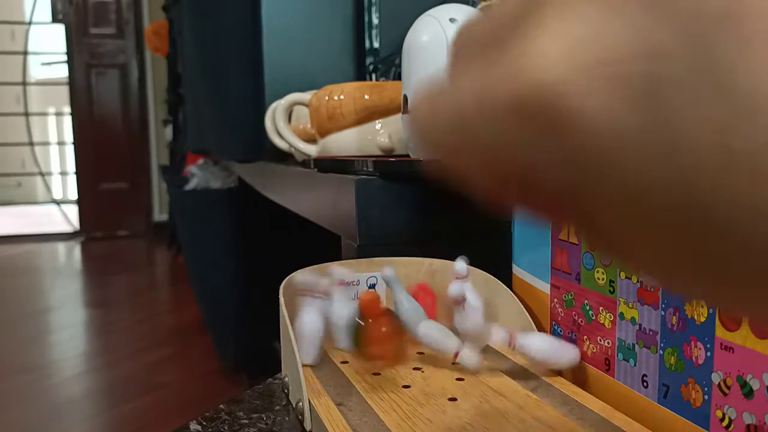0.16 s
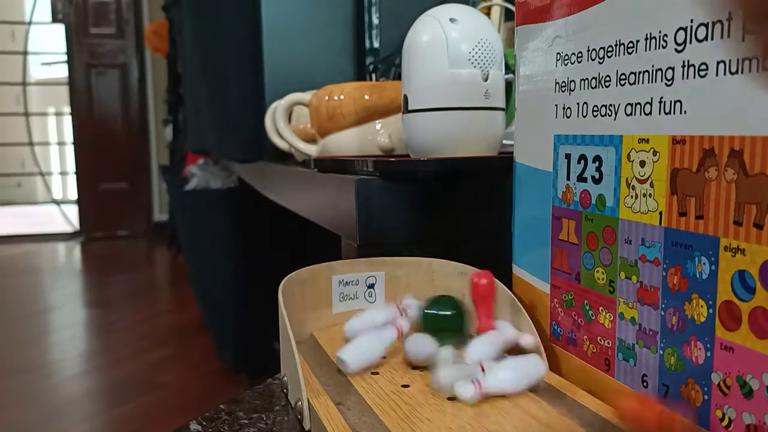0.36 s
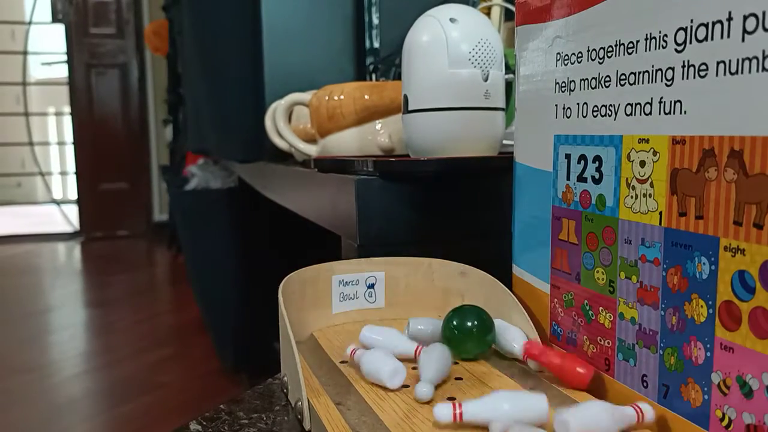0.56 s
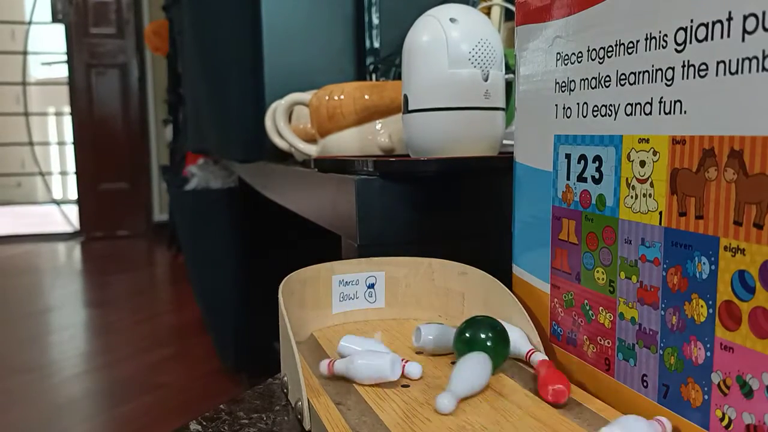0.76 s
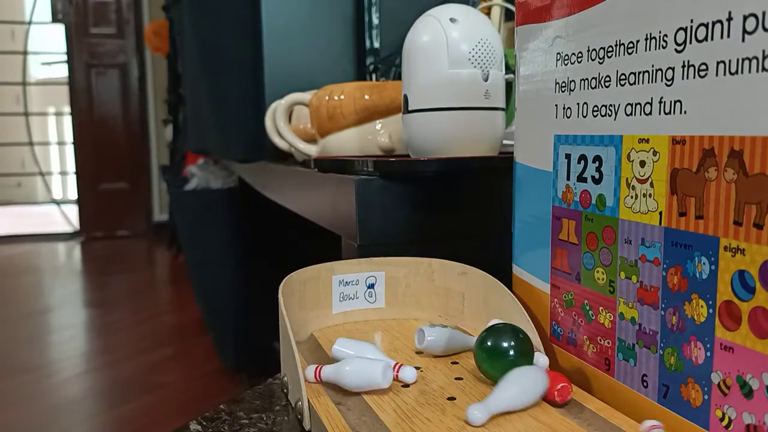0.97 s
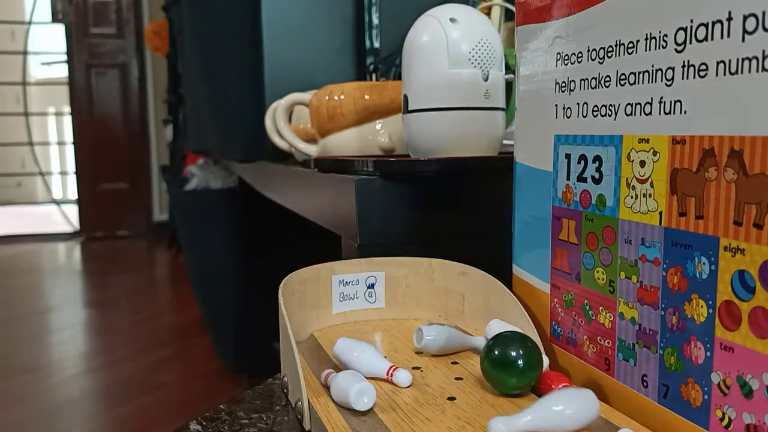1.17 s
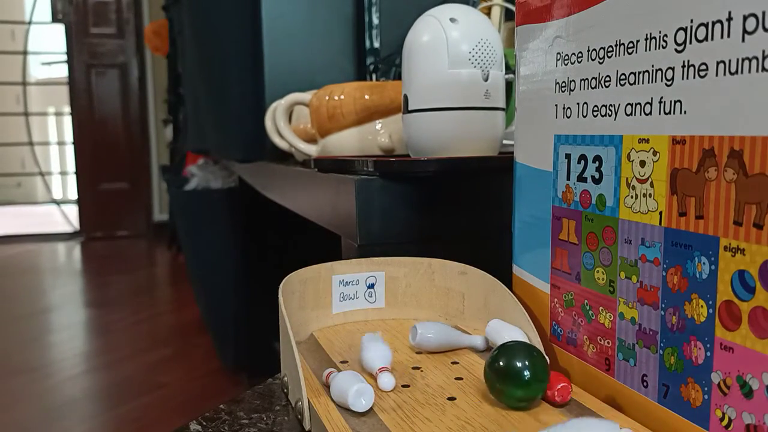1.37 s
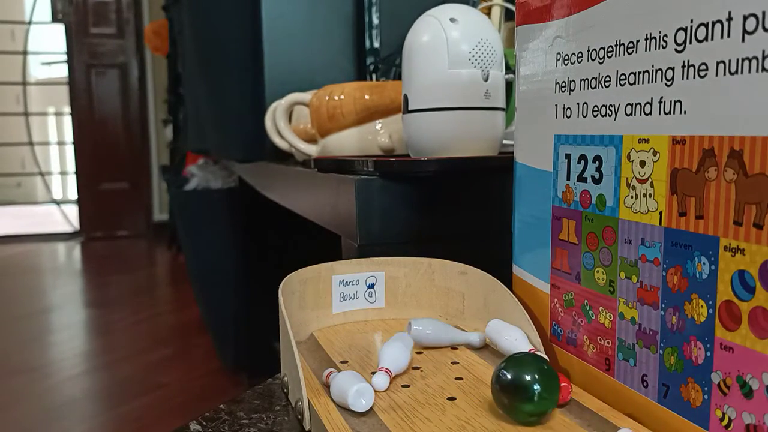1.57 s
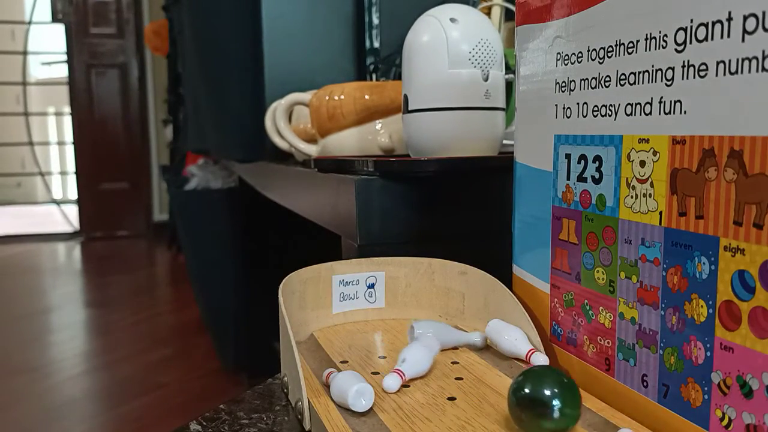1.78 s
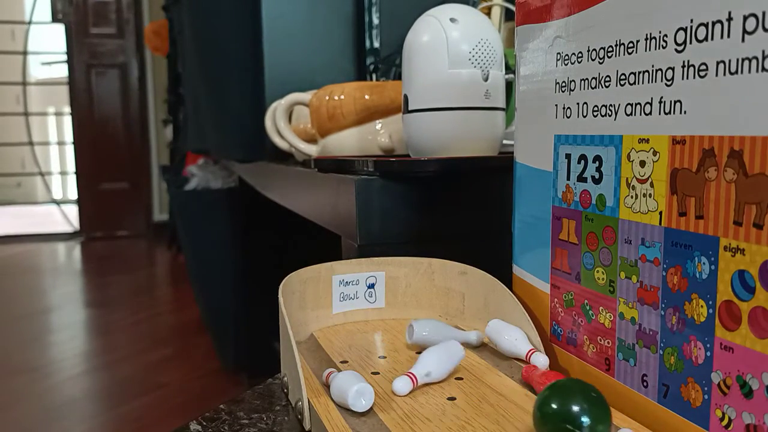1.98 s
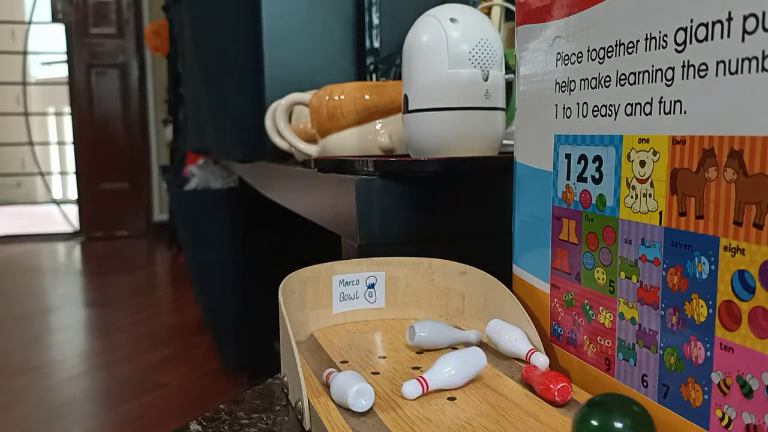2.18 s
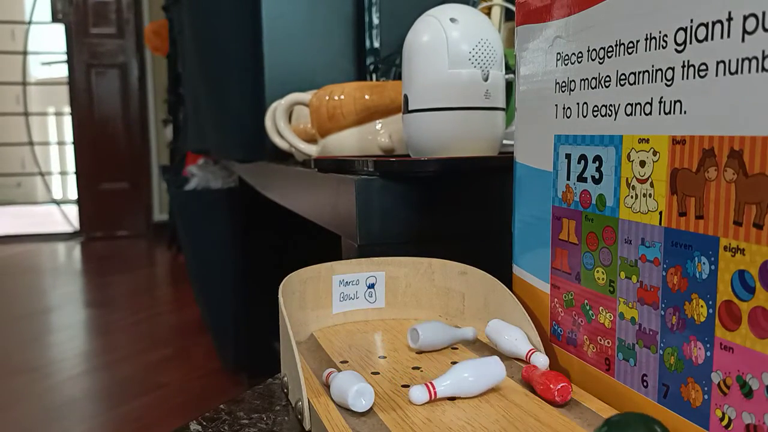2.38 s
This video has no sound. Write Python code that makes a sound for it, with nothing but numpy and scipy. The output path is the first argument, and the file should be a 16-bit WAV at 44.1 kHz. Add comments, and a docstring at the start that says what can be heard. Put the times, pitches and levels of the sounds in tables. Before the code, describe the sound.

A toy pin crash: a faint rub, then a sharp burst of clacks and woody knocks with brief high ringing, tumbling down to rare soft clicks, heard close up in a small, dry room.

```python
"""Room hiss and a mains hum come first, then a faint rub on the board. A small glass ball is flicked into
hard miniature pins on a thin wooden lane in a living room: they crack together, tumble and settle in
ever rarer ticks, and some ring briefly at a high pitch. Short rough contacts excite decaying modes of
board, pin body and crack; rattles and rubs are dense random touches on the same modes.
The hiss is shaped noise, the hum a few sines, the room a dull noise tail."""
import sys
import numpy as np
from scipy import signal
from scipy.fft import rfft, irfft
from scipy.io import wavfile

SR = 44100
rng = np.random.default_rng(int(sys.argv[2]) if len(sys.argv) > 2 else 0)


def output_pcm(signal):
    """Save a mono or channel-first signal as 16-bit PCM at the path in sys.argv[1].

    Samples are clipped to [-1, 1] before scaling.
    """
    pcm = np.clip(np.atleast_2d(signal).T, -1, 1) * 32767
    wavfile.write(sys.argv[1], SR, np.round(pcm).astype(np.int16))


def voltage_ratio(level):
    """Linear amplitude factor for a level in decibels (scalar or array-like)."""
    return 10 ** (np.asarray(level, float) / 20)


N = 108045   # length in samples

# Room hiss colour: f/Hz, relative spectral density level/dB
HISS_SPECTRUM = [(30, -24.5), (64, -6), (80, -12), (110, -7), (300, -15.5), (700, -20.5), (1270, -30.5),
                 (2400, -32.5), (4300, -40.5), (5200, -48.5), (8000, -40), (10300, -52), (14500, -50),
                 (16500, -69.5)]
# Room hiss loudness over time: t/s, rms level/dB
HISS_LEVEL = [(0, -62), (.19, -60.5), (0.899, -56), (1.501, -60), (2.45, -60.5)]
# Mains hum partials: f/Hz, rms level/dB
HUM = [(100, -63), (199, -68), (300, -67.5)]
# Something slides on the board: t/s, length/s, board level/dB, body level/dB, crack level/dB
SLIDES = [(0.118, 0.025, -50.5, -71, -74.5), (1.485, 0.065, -87, -87, -74), (1.89, 0.12, -69, -71.5, -65.5)]
# Tones that stand out while sliding: f/Hz, width/Hz, gain of the body sound through it/dB
SLIDE_SINGS = [(1750, 150, 16), (3253, 100, 10)]
# Tumbling between the knocks: t/s, rattle level/dB
TUMBLE = [(0.198, -70), (.25, -42), (.35, -39), (0.398, -43), (0.499, -39.5), (.65, -46), (.78, -53),
          (0.871, -54.5), (1.001, -72), (1.397, -72.5)]
# A pin knocked free rings: t/s, lower tone level/dB, upper tone level/dB
RINGS = [(0.244, -19.5, -23.5), (0.255, -34, -37), (0.27, -26, -35), (0.32, -15.5, -24), (.385, -31, -36),
         (0.44, -28.5, -40), (.459, -29, -27), (0.481, -34, -33), (0.515, -35, -20.5), (0.578, -28.5, -54),
         (0.616, -45, -55), (.635, -36.5, -67), (.789, -74, -54), (.814, -53, -71), (.831, -53, -69),
         (1.05, -92, -58), (1.075, -67, -53), (1.087, -70, -49.5), (1.098, -68, -47), (1.239, -77, -41),
         (1.307, -75.5, -62.5), (1.773, -50.5, -52.5), (1.845, -65.5, -51), (2.311, -81.5, -55)]
# A pin or the ball drops on the board: t/s, level/dB, pitch that the spot favours f/Hz
DROPS = [(0.1991, -19.5, 950), (0.2316, -44, 1270), (0.2488, -19, 960), (0.2835, -12, 667),
         (0.2860, -22.5, 165), (0.3001, -25, 730), (0.3156, -25.5, 1042), (0.338, -27, 1014),
         (0.3448, -18, 326), (0.3914, -25, 290), (0.3915, -22.5, 1130), (0.4192, -26, 1310),
         (0.419, -25.5, 280), (0.437, -27, 260), (0.4353, -20, 1360), (0.4558, -16, 736),
         (0.463, -23.5, 480), (0.5074, -30, 1270), (0.6465, -16.5, 663), (0.7987, -42, 1180),
         (0.8788, -38, 754), (0.983, -29.5, 650), (1.0103, -31, 710), (1.0738, -37.5, 765),
         (1.1197, -34.5, 630), (1.1635, -35.5, 1040), (1.1762, -39, 454), (1.305, -45, 775),
         (1.642, -44.5, 1150), (1.8533, -50, 1059), (2.3138, -42.5, 657)]
# Clear knocks: t/s, pin body level/dB, crack level/dB
KNOCKS = [(0.144, -47, -50.5), (0.1993, -21, -34), (0.2132, -22, -5.5), (0.2184, -22, -17),
          (0.22, -23, -12.5), (0.2268, -17, -21.5), (0.2294, -20, -8.5), (0.238, -41, -14.5),
          (0.2419, -30, -15), (0.2454, -24.5, -7.5), (0.2507, -21, -17.5), (0.2719, -14, -18.5),
          (0.2778, -16.5, -10.5), (0.2813, -8, -16), (0.291, -17.5, -15), (0.298, -16, -11),
          (0.3011, -13, -9.5), (0.3067, -15, -25.5), (0.316, -16.5, -9.5), (0.325, -8.5, -16),
          (0.333, -15, -9), (0.3375, -13.5, -12), (0.3473, -16.5, -12), (0.3525, -47, -23.5),
          (0.3819, -15.5, -25.5), (0.3836, -12.5, -16.5), (0.3919, -9.5, -22.5), (0.418, -15.5, -22.5),
          (0.4346, -13, -16.5), (0.4447, -19, -27.5), (0.4571, -11.5, -23.5), (0.479, -23.5, -20.5),
          (0.485, -19, -21.5), (0.4923, -20.5, -25), (0.5067, -16, -32), (0.5179, -13, -13),
          (0.5266, -13, -25), (0.547, -20, -31.5), (0.5503, -17.5, -38.5), (0.5527, -22, -24.5),
          (0.5749, -14.5, -29.5), (0.5805, -20, -25), (0.6028, -22, -25), (0.6161, -17.5, -39),
          (0.6342, -23, -29), (0.646, -21.5, -43.5), (0.656, -18, -36.5), (0.667, -45, -32.5),
          (0.675, -25.5, -42.5), (0.699, -25, -29), (0.711, -56, -43.5), (0.7155, -27.5, -46),
          (0.7377, -22.5, -17), (0.749, -50, -50), (0.7645, -60, -35.5), (0.786, -27, -40),
          (0.8042, -26.5, -20), (0.829, -34, -38), (0.8462, -27, -40), (0.8485, -47, -47),
          (0.874, -41, -57), (0.896, -48, -57), (0.9838, -37.5, -57), (0.9963, -51, -61.5),
          (1.0103, -36.5, -70), (1.036, -35.5, -57), (1.0446, -46, -41), (1.049, -41.5, -53.5),
          (1.0741, -28, -31), (1.0874, -38, -38.5), (1.0974, -31.5, -35), (1.117, -46, -45),
          (1.1625, -38.5, -75), (1.2385, -44, -40.5), (1.3049, -38.5, -40.5), (1.3132, -39, -60),
          (1.3225, -52, -61), (1.6423, -41, -66.5), (1.6472, -45.5, -71.5), (1.6495, -50, -69),
          (1.713, -47.5, -59), (1.7746, -46, -46.5), (1.8441, -50.5, -48), (1.8503, -44, -55),
          (1.9415, -53, -47), (2.31, -46.5, -52), (2.3386, -54, -77.5)]
# Modes of the wooden board: f/Hz, level/dB, 60 dB decay t/s
BOARD = [(165, -11.5, 0.014), (290, -6, 0.03), (480, -8, 0.03), (652, -3.5, 0.013), (844, -1, 0.014),
         (1048, -2, 0.034), (1278, 1, 0.021)]
# Modes of the pin body: f/Hz, level/dB, 60 dB decay t/s
BODY = [(1622, -3.5, 0.0019), (2320, -8.5, 0.0032), (2634, -8.5, 0.006), (3046, -5.5, 0.0043),
        (3700, -7.5, 0.0051), (4395, -4, 0.0024)]
# Modes of the bright crack: f/Hz, level/dB, 60 dB decay t/s
CRACK = [(5503, -10, 0.0028), (6290, -12.5, 0.0029), (6570, -14.5, 0.0096), (7360, -8, 0.0052),
         (8130, -1, 0.0028), (9470, -8, 0.0032), (11770, -16.5, 0.0017), (13500, -13.5, 0.002)]
# Pass band of each family, in rows board, body, crack: low edge f/Hz, high edge f/Hz
FAMILY_HZ = [(330, 1600), (1200, 5200), (4200, 17000)]

ROOM_DB, ROOM_T60_S, WALL_CUT_HZ = -17, 0.23, 1800
SLIDE_TOUCHES_PER_S = 3000
RATTLES_PER_S, RATTLE_SPREAD_DB, RATTLE_BAND_HZ = 1200, 1.5, [230, 15000]
RING_HZ, RING_T60_S = [8730, 9964], [0.04, 0.023]   # lower and upper tone
RING_TAIL_DB, RING_TAIL_T60_S = -17, [0.26, 0.23]
RING_SCATTER_HZ, RING_WOBBLE, RING_WOBBLE_HZ = 30, 0.4, 25   # wobble: rms share of the tone's height
CONTACT_S, CONTACT_ROUGHNESS, MODE_SCATTER_DB = 0.00044, 0.9, 4
DROP_DB_PER_OCTAVE, DROP_BAND_HZ = 24, [100, 870]
BOARD_FOLLOWS_DB = -22   # board under a knock, relative to the pin body
CHATTER_S, CHATTER_DB = 0.0057, -7.5
LANE_LOW_CUT_HZ = 110


def rms_one(x):
    """Scale to rms 1."""
    return x / np.sqrt(np.mean(x ** 2) + 1e-20)


def band(x, edges_hz):
    """Band-pass between two edges."""
    return signal.sosfilt(signal.butter(2, edges_hz, "band", fs=SR, output="sos"), x)


def curve(points):
    """Gain over time, drawn in straight lines of dB between the points."""
    return voltage_ratio(np.interp(np.arange(N) / SR, *np.transpose(points)))


def ring(clicks, hz, t60):
    """A damped mode: a unit click sets a sine of height 1 ringing."""
    radius = voltage_ratio(-60 / (t60 * SR))
    turn = 2 * np.pi * hz / SR
    return signal.lfilter([0, np.sin(turn)], [1, -2 * radius * np.cos(turn), radius ** 2], clicks + 1e-18)


def resonance(x, hz, width_hz):
    """A resonance of gain 1 at its top."""
    radius = np.exp(-np.pi * width_hz / SR)
    side = (1 - radius ** 2) / 2
    poles = [1, -2 * radius * np.cos(2 * np.pi * hz / SR), radius ** 2]
    return signal.lfilter([side, 0, -side], poles, x)


def struck(times, db, modes, edges_hz, favoured_hz=None):
    """Each blow is a short contact that builds up every mode; a favoured pitch makes it a smooth drop."""
    n = np.arange(160)
    hard = favoured_hz is None
    at = (np.asarray(times) * SR).astype(int)[:, None] + n
    fade = np.exp(-n / (CONTACT_S * SR))
    out = 0
    for k, (hz, level_db, t60) in enumerate(modes):
        draw = rng.standard_normal((len(at), 162))
        phase = np.pi * k + hard * 10 * draw[:, 1:2]
        push = np.cos(2 * np.pi * hz * n / SR + phase) + hard * CONTACT_ROUGHNESS * draw[:, 2:]
        shape = 2 * fade / fade.sum() * push
        if hard:
            off_db = MODE_SCATTER_DB * draw[:, 0]
        else:
            off_db = -DROP_DB_PER_OCTAVE * np.abs(np.log2(hz / favoured_hz))
        blows = voltage_ratio(db + level_db + off_db)[:, None] * shape
        clicks = np.bincount(at.ravel(), blows.ravel(), N + 160)
        out = out + ring(clicks[:N], hz, t60)
    return band(out, edges_hz)


def grains(touches, mix_db):
    """Dense random touches strike board, body and crack modes; each family has rms 1 before the mix."""
    parts = []
    for db, modes, edges_hz in zip(mix_db, (BOARD, BODY, CRACK), FAMILY_HZ):
        family = 0
        for hz, level_db, t60 in modes:
            family = family + voltage_ratio(level_db) * ring(touches * rng.standard_normal(N), hz, t60)
        parts.append(voltage_ratio(db) * rms_one(band(family, edges_hz)))
    return parts


def air():
    """Room hiss, noise shaped to its spectrum, over a steady mains hum of sines."""
    hz = np.arange(N // 2 + 1) * SR / N + 1
    f, db = np.transpose(HISS_SPECTRUM)
    colour = voltage_ratio(np.interp(np.log(hz), np.log(f), db))
    hiss = rms_one(irfft(rfft(rng.standard_normal(N)) * colour, N))
    hum = 0
    for hum_hz, level_db in HUM:
        cycles = hum_hz * np.arange(N) / SR + rng.random()
        hum = hum + voltage_ratio(level_db) * np.sqrt(2) * np.sin(2 * np.pi * cycles)
    return curve(HISS_LEVEL) * hiss + hum


def room(x):
    """Reverberation as a dying, dull noise tail."""
    t = np.arange(SR // 2) / SR
    tail = rng.standard_normal(len(t)) * voltage_ratio(-60 * t / ROOM_T60_S) * (t > .003)
    tail = signal.sosfilt(signal.butter(1, WALL_CUT_HZ, fs=SR, output="sos"), tail)
    return voltage_ratio(ROOM_DB) * signal.fftconvolve(x, tail / np.sqrt(np.sum(tail ** 2)))[:N]


def slides():
    """Short rubbing strokes: dense touches under a swell that starts fast and fades."""
    t = np.arange(N) / SR
    board, body, crack = grains(rng.random(N) < SLIDE_TOUCHES_PER_S / SR, [0, 0, 0])
    body = body + sum(voltage_ratio(db) * resonance(body, hz, width_hz) for hz, width_hz, db in SLIDE_SINGS)
    out = 0
    for s, length, *levels_db in SLIDES:
        progress = np.clip((t - s) / length, 0, 1)
        stroke = np.sin(np.pi * progress ** 0.5).clip(0) ** 2
        out = out + stroke * sum(voltage_ratio(db) * part for db, part in zip(levels_db, (board, body, crack)))
    return out


def tumble():
    """Small rattles between the knocks: random touches of uneven force on all modes."""
    force = voltage_ratio(RATTLE_SPREAD_DB * np.minimum(rng.exponential(1, N), 4))
    touches = (rng.random(N) < RATTLES_PER_S / SR) * force
    rattle = band(sum(grains(touches, [-10, 0.5, -5])), RATTLE_BAND_HZ)   # dB: board, body, crack
    level = np.interp(np.arange(N) / SR, *np.transpose(TUMBLE), -120, -120)
    return voltage_ratio(level) * rattle


def rings():
    """Two high tones of a free pin, each with a weaker, longer neighbour; their loudness wavers irregularly."""
    s, *levels_db = np.transpose(RINGS)
    at = (s * SR).astype(int)
    pin = rng.integers(0, 3, len(s))   # three pins, slightly apart in pitch
    out = 0
    for db, hz, t60, tail_t60 in zip(levels_db, RING_HZ, RING_T60_S, RING_TAIL_T60_S):
        for k in range(3):
            clicks = np.bincount(at, voltage_ratio(db) * (pin == k), N)
            slow_noise = rms_one(resonance(rng.standard_normal(N), RING_WOBBLE_HZ, RING_WOBBLE_HZ))
            wobble = 1 + RING_WOBBLE * slow_noise
            tone = ring(clicks, hz + RING_SCATTER_HZ * (k - 1), t60)
            tail = voltage_ratio(RING_TAIL_DB) * ring(clicks, hz - 20 + 10 * k, tail_t60)
            out = out + resonance(wobble * (tone + tail), hz, 2100)
    return out


def drops():
    """A pin or the ball drops on the board, which sounds most near the pitch its spot favours."""
    s, db, spot_hz = np.transpose(DROPS)
    return struck(s, db, BOARD, DROP_BAND_HZ, spot_hz)


def knocks():
    """Hard knocks sound in pin body and crack, faintly in the board; two weaker touches follow each."""
    s, body_db, crack_db = np.transpose(KNOCKS)
    first, second = rng.random((2, len(s)))
    s = np.concatenate([s, s + CHATTER_S * (first + 0.3) / 2, s + CHATTER_S * (second + 1.3) / 2])
    body_db = np.concatenate([body_db, body_db + CHATTER_DB, body_db + 2 * CHATTER_DB])
    crack_db = np.concatenate([crack_db, crack_db + CHATTER_DB, crack_db + 2 * CHATTER_DB])
    board = struck(s, body_db + BOARD_FOLLOWS_DB, BOARD, FAMILY_HZ[0])
    body = struck(s, body_db, BODY, FAMILY_HZ[1])
    crack = struck(s, crack_db, CRACK, FAMILY_HZ[2])
    return board + body + crack


def scene():
    """Lane sounds, thin in the bass, in the room, over the air."""
    low_cut = signal.butter(4, LANE_LOW_CUT_HZ, "high", fs=SR, output="sos")
    lane = signal.sosfilt(low_cut, slides() + tumble() + rings() + drops() + knocks())
    return (air() + room(lane) + lane)[None]


def band_limit(x):
    """A steep low-pass at the top of the band."""
    return signal.sosfilt(signal.butter(12, 16810, fs=SR, output="sos"), x)


def record(dry):
    """Deliver the finished mix."""
    return band_limit(dry)


dry = scene()
out = record(dry)
output_pcm(out)
```